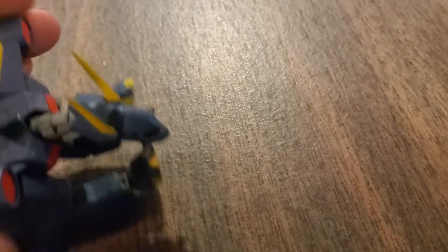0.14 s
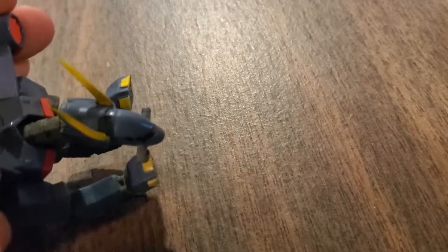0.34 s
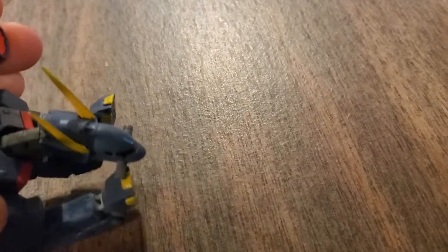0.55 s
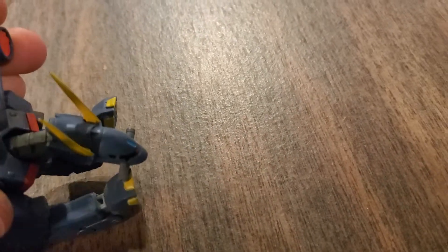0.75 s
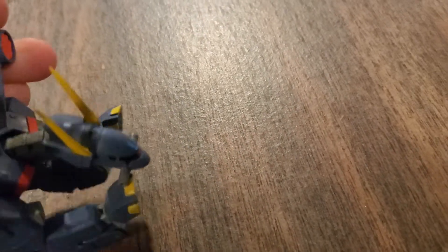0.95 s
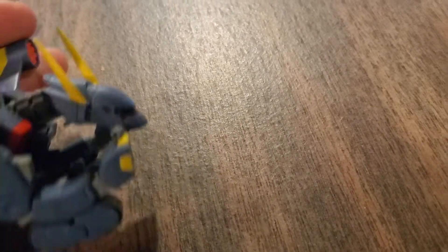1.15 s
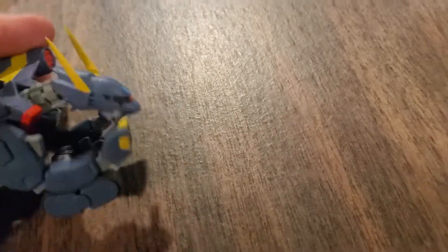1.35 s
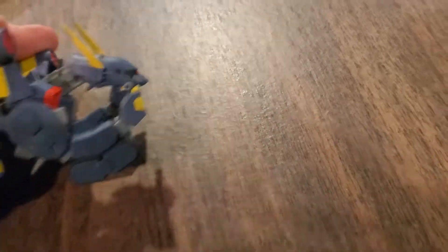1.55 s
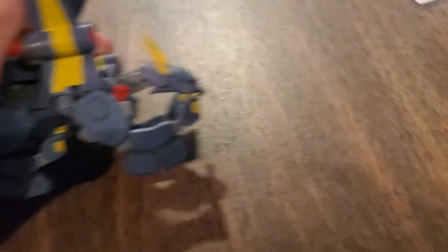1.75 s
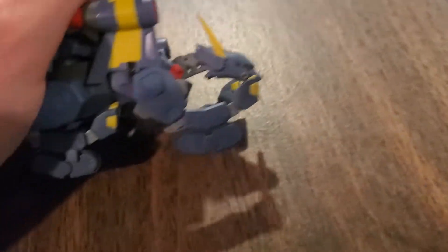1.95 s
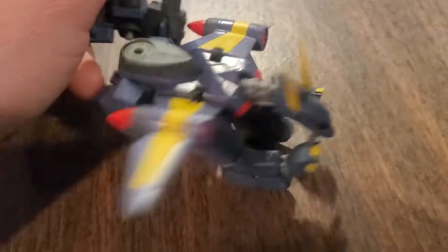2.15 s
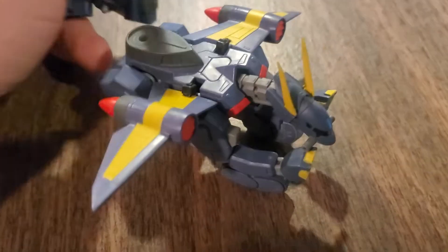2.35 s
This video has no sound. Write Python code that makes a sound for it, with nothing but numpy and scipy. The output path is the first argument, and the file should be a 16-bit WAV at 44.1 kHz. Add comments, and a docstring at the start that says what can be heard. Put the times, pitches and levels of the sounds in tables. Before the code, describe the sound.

A plastic toy figure clicks close up, its feet softly tapping a wooden table around 0.2 seconds. A stiff joint ratchets faintly near 0.7 seconds, and sharper clicks around 1 second lead to a hard knock at 1.3. Fingers rub and the feet drag. From 2 seconds come sharp clicks, a brief squeak, rattling parts and knocks fading in the wood, over faint room hum and hiss.

```python
"""A jointed plastic toy figure is handled close up on a wooden table, in a small room with hum and hiss.
First its parts click and its feet tap the top, which booms softly; then a stiff joint ratchets under a
faint whine. More clicks lead to a hard knock at 1.3 s, and fingers rub while the feet drag. From 2 s
comes a last flurry: sharp clicks, a squeak, loose parts ringing and knocks that fade in the wood."""
import sys
import numpy as np
from scipy import signal
from scipy.fft import rfft, irfft
from scipy.io import wavfile

SR = 44100
rng = np.random.default_rng(int(sys.argv[2]) if len(sys.argv) > 2 else 0)


def log_audio(samples):
    """Write samples as a 16-bit WAV file to the path given in sys.argv[1]."""
    # one column per channel
    frames = np.atleast_2d(samples).T
    # limit to full scale, then quantise
    limited = np.clip(frames, -1, 1)
    pcm = np.round(limited * 32767).astype(np.int16)
    wavfile.write(sys.argv[1], SR, pcm)


N = 110250
TIME = np.arange(N) / SR

# the feet strike the table: start_s, boom_db, knock_db
FOOTFALLS = [(0.036, -61.5, -46), (.228, -48.5, -83), (.245, -49.5, -46), (.278, -47, -53.5),
             (.629, -51, -52.5), (0.735, -57.5, -61), (.816, -63.5, -68.5), (1.232, -48, -62),
             (1.2862, -38.5, -26), (1.371, -48.5, -44.5), (1.834, -45, -49.5), (2.015, -48, -41),
             (2.084, -46, -49), (2.184, -36, -29), (2.256, -59, -48.5), (2.341, -54.5, -54)]


def from_db(db):
    """Decibels to gain."""
    return 10 ** (np.asarray(db) / 20)


def rms_one(x):
    """Scale to unit rms."""
    return x / np.sqrt(np.mean(x ** 2) + 1e-20)


def at_hz(points, hz):
    """Read a curve on a log-frequency axis."""
    freqs, values = np.transpose(points)
    return np.interp(np.log(hz + 1), np.log(freqs), values)


def colour(x, points):
    """Shape a noise with an EQ curve."""
    size = x.shape[-1]
    return irfft(rfft(x) * from_db(at_hz(points, np.fft.rfftfreq(size, 1 / SR))), size)


def pass_filter(x, kind, hz, order):
    """Butterworth low-pass or high-pass."""
    return signal.sosfilt(signal.butter(order, hz, kind, fs=SR, output="sos"), x)


def pan(hz):
    """Left and right gains of the figure at a frequency, at constant power."""
    # stereo balance: freq_hz, left_minus_right_db
    balance = [(2300, -7), (5400, -7.5), (12000, 27)]
    db = at_hz(balance, hz)
    gains = from_db(np.array([db, -db]) / 2).reshape(2, -1)
    return gains / np.sqrt(np.mean(gains ** 2, axis=0))


def ring(push, hz, t60):
    """One resonance: a unit impulse sets off a decaying sine of height 1."""
    radius, angle = from_db(-60 / (t60 * SR)), 2 * np.pi * hz / SR
    return signal.lfilter([0, np.sin(angle)], [1, -2 * radius * np.cos(angle), radius ** 2], push + 1e-18)


def decay(start_s, t60):
    """An envelope with an instant attack that falls 60 dB in t60 seconds."""
    return from_db(-60 * np.abs(TIME - start_s) / t60) * (TIME > start_s)


def swell(middle_s, length_s):
    """A bell-shaped envelope."""
    return np.exp(-(2 * (TIME - middle_s) / length_s) ** 2)


def add(out, start_s, sound):
    """Mix a sound in at a time."""
    i = max(int(start_s * SR), 0)
    out[i:i + len(sound)] += sound[:N - i]


def stereo_noise(spectrum):
    """Coloured noise, centred in the bass and wide in the treble."""
    mid, side = colour(rng.standard_normal((2, N)), spectrum)
    side = pass_filter(side, "high", hz=560, order=1)
    return rms_one(mid + side * [[1], [-1]])


def room_tone():
    """A steady bed of low hum and hiss."""
    # spectrum of the bed: freq_hz, gain_db
    bed_eq = [(25, -12), (68, 5), (110, -7), (700, -31.5), (4000, -32), (8000, -42), (14000, -30.5)]
    return from_db(-63) * stereo_noise(bed_eq)


def room(x, size=30000):
    """Quick reflections from the table and hands, then the faint, dull tail of the room."""
    # tone of the reflections: freq_hz, gain_db
    room_eq = [(300, -2), (1800, 1), (5000, -4.5)]
    t = TIME[:size]
    predelay_s, crossfeed = 0.00084, 0.78

    def reflections(t60):
        return colour(rms_one(rng.standard_normal((2, size)) * from_db(-60 * t / t60)), room_eq)

    early = from_db(-6.5) * reflections(t60=0.017)
    tail = pass_filter(from_db(-14.5) * reflections(t60=0.36), "low", hz=6000, order=1)
    response = (early + tail) * (t > predelay_s) / np.sqrt(size)
    return signal.fftconvolve(x + crossfeed * x[::-1], response, axes=1)[:, :N]


def whine(middle_s=0.58, length_s=0.64, base_hz=2900, sag_hz=175):
    """A faint, thin whine arches up and down in pitch; only harmonics 2 and 4 sound."""
    from_middle = 2 * (TIME - middle_s) / length_s
    phase = 2 * np.pi * np.cumsum(base_hz - sag_hz * from_middle ** 2) / SR
    return from_db(-82) * np.exp(-from_middle ** 4) * sum(np.sin(k * phase) for k in (2, 4))


def dragging():
    """The wood rumbles under the sliding feet."""
    # level curve of the drag: time_s, level_db
    fader = [(0, -60), (.16, -56.5), (.42, -86.5), (1.17, -72), (1.26, -60.5), (1.83, -55), (1.97, -55.5),
             (2.3, -57.5), (2.5, -78.5)]
    # spectrum of the rumble: freq_hz, gain_db
    rumble_eq = [(60, 1), (300, -2), (550, -15.5), (880, -5.5), (1150, -18), (5000, -23)]
    return from_db(np.interp(TIME, *np.transpose(fader))) * stereo_noise(rumble_eq)


def rubbing(catches_per_s=490, spread_db=2, split_hz=7000):
    """Fingers and joints rub: friction with tiny catches, its rasp and hiss swelling with each stroke."""
    # strokes: middle_s, length_s, rasp_db, hiss_db
    strokes = [(0.136, 0.031, -57.5, -54), (0.47, 0.054, -56, -52), (1.276, 0.33, -60, -57),
               (1.67, 0.49, -60, -56), (1.789, 0.028, -45, -46.5), (2.046, 0.073, -44.5, -43.5)]
    # spectrum of the friction: freq_hz, gain_db
    friction_eq = [(530, -59), (950, -18.5), (3500, 2), (9000, -7.5), (14200, 3.5), (16000, -10.5)]
    catches = rng.random(N) < catches_per_s / SR
    strength = from_db(spread_db * np.minimum(rng.exponential(1, N), 4))
    grains = rms_one(catches * strength * rng.standard_normal((2, N)))
    friction = colour(rng.standard_normal((2, N)) + from_db(-4) * grains, friction_eq)
    hz = np.fft.rfftfreq(N, 1 / SR)
    spectrum = rfft(friction) * pan(hz)
    rasp, hiss = (rms_one(irfft(spectrum * band, N)) for band in (hz < split_hz, hz >= split_hz))
    return sum(swell(middle_s, length_s) * (from_db(rasp_db) * rasp + from_db(hiss_db) * hiss)
               for middle_s, length_s, rasp_db, hiss_db in strokes)


def squeak():
    """Plastic sticks and slips on plastic, ringing one narrow resonance."""
    # stick-slip burst: middle_s, length_s, pitch_hz, level_db
    bursts = [(2.034, 0.042, 5380, -39)]
    out = 0
    for middle_s, length_s, hz, db in bursts:
        chatter = np.diff(rng.standard_normal((2, N + 1)))
        tone = rms_one(ring(chatter, hz, t60=0.027))
        out = out + from_db(db) * swell(middle_s, length_s) * tone * pan(hz)
    return out


def table_boom():
    """Each footfall rings the low modes of the top, each with a strength of its own."""
    # modes of the table top: pitch_hz, level_db, t60_s
    modes = [(70.6, -4, 0.61), (171.9, -14.5, 0.53), (287.3, -9, 0.45), (377.8, -6.5, 0.17),
             (470, -12.5, 0.22)]
    start_s, boom_db, _ = np.transpose(FOOTFALLS)
    out = np.zeros(N)
    for k, (hz, db, t60) in enumerate(modes):
        push = np.zeros(N)
        push[(start_s * SR).astype(int)] = from_db(boom_db + db + rng.standard_normal(len(start_s)))
        out += (-1) ** k * ring(push, hz, t60)
    return out


def table_thuds():
    """The dense, quickly dying vibration of the table after each footfall."""
    # spectrum of the thud: freq_hz, gain_db
    thud_eq = [(150, 1.5), (400, -15), (1500, -28.5)]
    envelope = sum(from_db(db - 0.5) * decay(start_s, t60=0.21) for start_s, db, _ in FOOTFALLS)
    return envelope * pass_filter(stereo_noise(thud_eq), "low", hz=1500, order=2)


def wood_knocks():
    """The wood under the feet: a broad, short knock, different at every spot, and a weaker after-ring."""
    # dense upper modes of the wood: freq_hz, gain_db
    wood_eq = [(520, -14), (820, 6.5), (1200, -11), (2400, -7), (3300, -30)]
    out = 0
    for start_s, _, db in FOOTFALLS:
        envelope = decay(start_s, t60=0.044) + from_db(-15) * decay(start_s, t60=0.24)
        wood = pass_filter(colour(rng.standard_normal(N), wood_eq), "low", hz=3300, order=2)
        out = out + from_db(db) * rms_one(envelope * wood) * np.sqrt(np.mean(envelope ** 2))
    return out


def loose_parts():
    """A tapped part rings briefly at one clear pitch."""
    # taps: start_s, pitch_hz, level_db
    taps = [(1.3953, 2900, -39), (2.0149, 1502, -19.5), (2.0161, 2525, -29.5), (2.0716, 2300, -28.5),
            (2.1278, 5400, -24.5)]
    return sum(from_db(db) * decay(s, t60=0.018) * np.sin(2 * np.pi * hz * (TIME - s)) * pan(hz)
               for s, hz, db in taps)


def ratchet_slips(spread_db=6.5, shell_offset_db=-13):
    """A stiff joint gives in tiny, uneven slips; returns one click cue for each."""
    # turn of the joint: start_s, end_s, slips_per_s, level_db
    turns = [(0.639, 0.87, 90, -61)]
    cues = []
    for start_s, end_s, rate, db in turns:
        count = int((end_s - start_s) * rate) + 1
        for k, (jitter, accent) in enumerate(rng.standard_normal((count, 2))):
            slip_s = start_s + (k + .5 * np.tanh(jitter)) / rate
            slip_db = db + spread_db * accent
            cues.append((slip_s, slip_db + shell_offset_db, slip_db, slip_db))
    return cues


def plastic_click(levels_db, size=1100, contact_s=0.0005, spread_db=2.5):
    """A brief swell of contact chatter rings the hollow shell, the panels and the hard edges."""
    # modes of the figure: pitch_hz, level_db
    modes = [(1500, -1.5), (2000, -4.5), (2550, 0), (3450, 3), (4100, -3), (5400, 2.5), (6400, 4.5),
             (8000, -5.5), (12700, 5), (14400, -3)]
    # crossovers from shell to panels and from panels to edges: freq_hz
    crossovers = [2800, 8500]
    t = TIME[:size]
    contact = t / contact_s * np.exp(1 - t / contact_s)
    parts = np.zeros((3, 2, size))
    for hz, db in modes:
        chatter = np.diff(rng.standard_normal((2, size)) * contact, prepend=0)
        t60 = 0.0088 * (modes[0][0] / hz) ** 0.94  # higher modes die sooner
        mode = np.array([rms_one(ring(channel, hz, t60)) for channel in chatter])
        parts[np.searchsorted(crossovers, hz)] += mode * pan(hz) * from_db(db + spread_db * rng.normal())
    gains = from_db(levels_db) * np.sqrt(.002 * SR / size)  # levels are rms over 2 ms
    return sum(gain * rms_one(part) for gain, part in zip(gains, parts))


def figure_clicks(right_lag_s=.0003):
    """Joints and loose parts click, reaching the left microphone first."""
    # click cues: start_s, shell_db, panels_db, edges_db
    cues = [(0.016, -44, -37.5, -38), (0.1876, -50.5, -49.5, -48), (0.2175, -51, -33, -16),
            (0.2256, -54, -42, -22), (0.2335, -36, -29, -34), (0.2358, -41.5, -25, -26),
            (0.2391, -39.5, -28.5, -19.5), (0.6894, -56.5, -50.5, -35), (0.7362, -49.5, -35.5, -54),
            (0.8164, -58.5, -46.5, -50.5), (0.8672, -73, -56, -70), (0.915, -81, -53.5, -48.5),
            (0.9485, -68, -20.5, -16.5), (0.9756, -44.5, -46, -44), (0.9972, -66, -24, -26),
            (1.007, -49, -26, -28.5), (1.0252, -52, -53, -53), (1.0475, -65, -39, -30.5),
            (1.0518, -47, -29.5, -36.5), (1.139, -60.5, -38.5, -39), (1.1794, -54.5, -30, -26),
            (1.1919, -64, -43, -47), (1.2111, -52, -47, -36.5), (1.2873, -23.5, -21.5, -17.5),
            (1.3007, -38, -30, -23.5), (1.5613, -50.5, -37, -38.5), (1.5985, -51, -36.5, -40),
            (1.874, -41.5, -33, -32), (2.0099, -34.5, -23, -25.5), (2.0153, -19.5, -18.5, -26.5),
            (2.0564, -28, -19.5, -13), (2.0865, -38.5, -39, -49.5), (2.1283, -30.5, -30, -35),
            (2.1686, -34.5, -35.5, -45), (2.1863, -20.5, -28.5, -20.5)]
    out = np.zeros((2, N))
    for start_s, *levels_db in [*cues, *ratchet_slips()]:
        left, right = plastic_click(levels_db)
        add(out[0], start_s, left)
        add(out[1], start_s + right_lag_s, right)
    return pass_filter(out, "high", hz=1100, order=2)  # small parts radiate no bass


def scene():
    """The figure and the table with their reflections, over the drag and the room tone."""
    direct = figure_clicks() + loose_parts()
    direct += table_boom() + table_thuds() + wood_knocks()
    direct += rubbing() + squeak() + whine()
    return direct + room(direct) + dragging() + room_tone()


def record(dry, ceiling=.95, top_hz=16300):
    """Cut the deepest bass, soft-clip the sharpest peaks and cut the very top."""
    thinned = pass_filter(dry, "high", hz=46, order=4)
    rounded = ceiling * np.tanh(thinned / ceiling)
    return signal.sosfilt(signal.ellip(10, .3, 70, top_hz, fs=SR, output="sos"), rounded)


dry = scene()
out = record(dry)
log_audio(out)
```